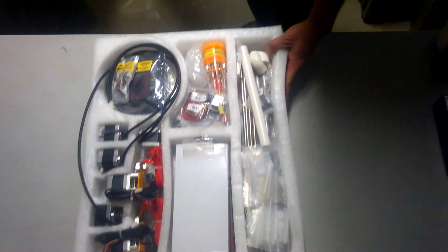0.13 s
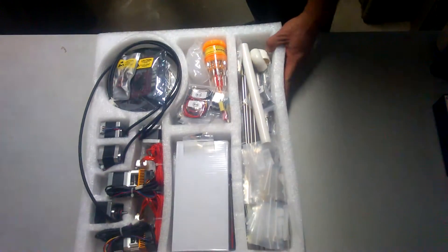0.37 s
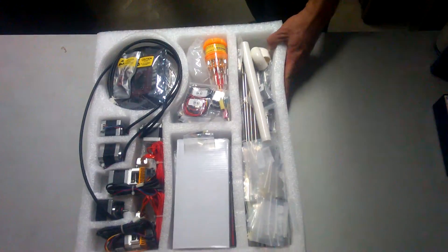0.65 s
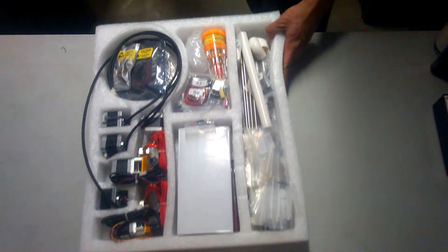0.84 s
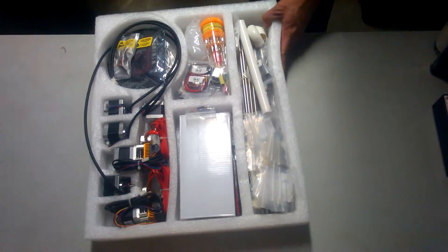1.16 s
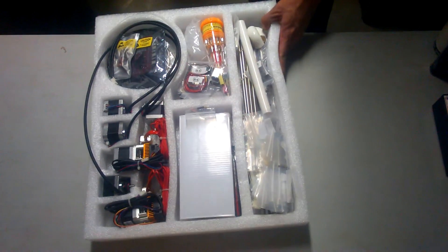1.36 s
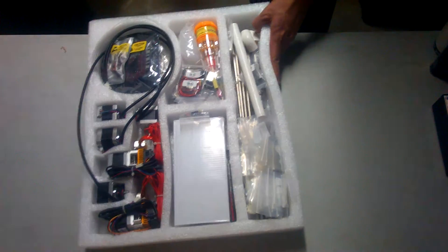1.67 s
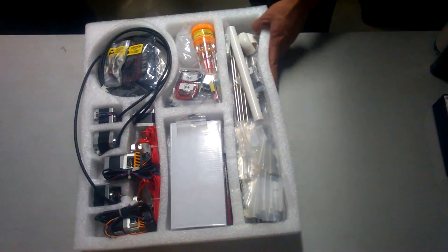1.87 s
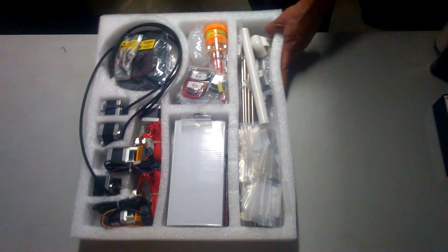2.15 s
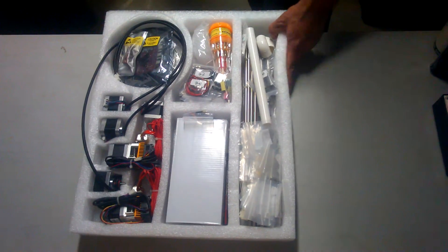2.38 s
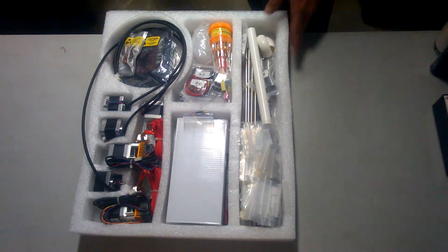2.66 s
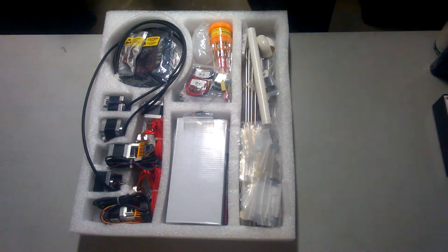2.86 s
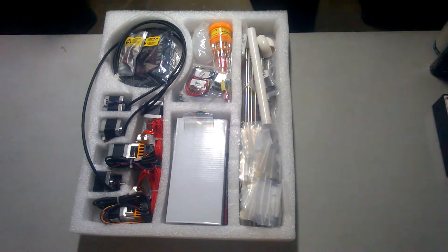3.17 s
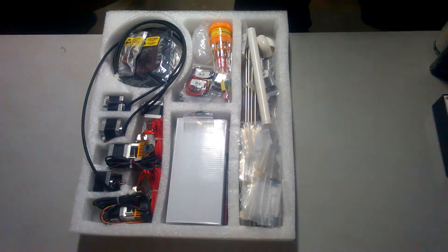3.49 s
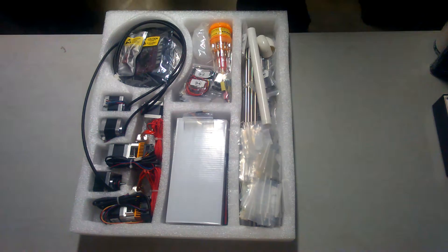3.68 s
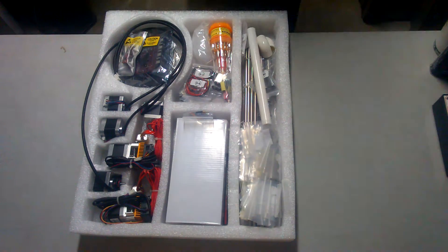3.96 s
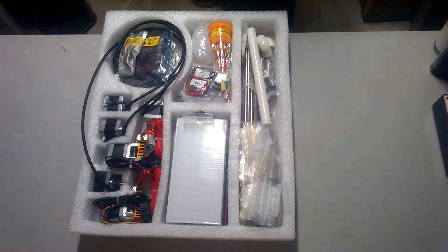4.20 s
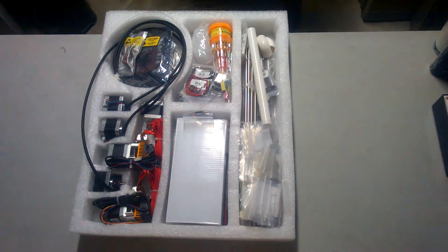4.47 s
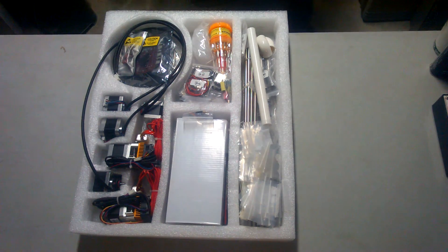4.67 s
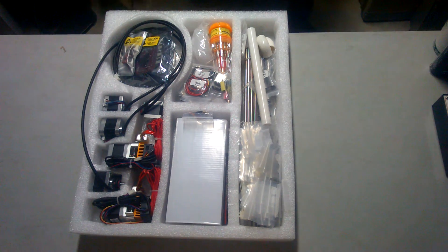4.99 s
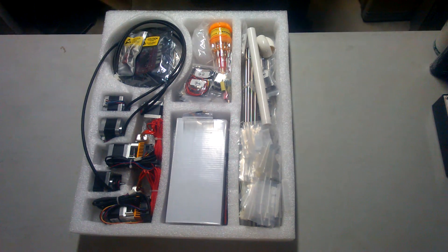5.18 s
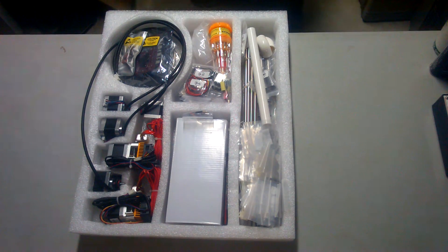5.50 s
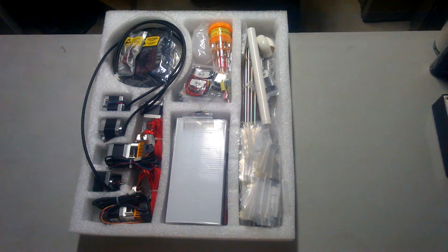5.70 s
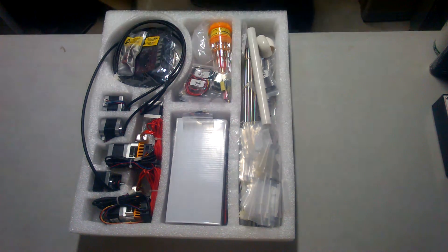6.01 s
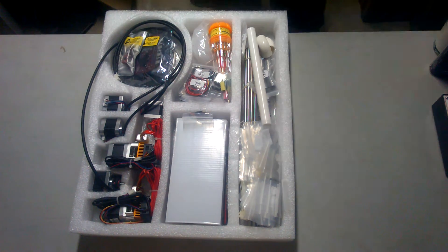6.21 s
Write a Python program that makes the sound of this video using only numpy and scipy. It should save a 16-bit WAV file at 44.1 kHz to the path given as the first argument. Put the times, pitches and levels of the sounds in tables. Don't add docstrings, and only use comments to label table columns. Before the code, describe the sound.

Close to a small camera in a quiet humming room, a foam tray is dragged over a table in short, soft, raspy strokes. One plastic part snaps sharply early on. Lighter brushing and tiny ticks follow, then a stiffer foam layer is pulled with loud hiss, squeaks and a low rising moan. It comes down in several hollow knocks that shake the table, and the room settles with faint ticks.

```python
import sys
import numpy as np
from scipy import signal
from scipy.fft import rfft, irfft, next_fast_len
from scipy.io import wavfile
from scipy.ndimage import uniform_filter1d, map_coordinates

SR = 44100
rng = np.random.default_rng(int(sys.argv[2]) if len(sys.argv) > 2 else 0)


def volts_from_decibels(level):
    exponent = np.asarray(level, float) / 20
    return 10 ** exponent


def store_wav(level_fs):
    pcm = np.round(np.clip(np.atleast_2d(level_fs), -1, 1) * 32767)
    wavfile.write(sys.argv[1], SR, pcm.T.astype(np.int16))


N = 279853

# freq_hz, density_db
HISS_SPECTRUM = [(5500, -23), (7500, -10.5), (9500, -4.5), (11500, -4), (13500, 1), (15400, 1)]
RASP_SPECTRUM = [(1500, -28.5), (2300, 0.5), (4000, -2), (6500, -2.5), (8500, -9)]
SCRAPE_SPECTRUM = [(300, -12), (550, -4), (900, 0), (1400, -1), (2000, -4.5), (2800, -55)]
TABLE_SPECTRUM = [(15, -13), (30, -4), (70, -12), (120, -2.5), (180, -32.5)]
ROOM_SPECTRUM = [(12, -43), (20, -17.5), (76, -0.5), (171, -9), (216, -10.5), (439, -10), (474, -13),
                 (513, -11), (613, -10.5), (1460, -28), (2200, -62.5), (2860, -64), (4840, -120)]
MIC_HISS_SPECTRUM = [(1500, -12), (3000, -6), (8000, -28), (13000, 13), (15400, 12)]

# freq_hz, width_hz, level_db
SHEET_MODES = [(507, 42, 3.5), (657, 34, 11), (835, 450, -1.5), (906, 11.6, 11), (1054, 63, -3),
               (1302, 19, 3.5), (1380, 13, -20)]
LOWER_MODES = [(145, 18, -4), (194.2, 15.2, 0), (231.7, 19, 0), (265, 25, -5)]
UPPER_MODES = [(306, 18, 2.5), (339.2, 16.2, 4), (394, 17.3, 0), (525.5, 67, -6.5)]
PART_MODES = [(653, 124, 3.5), (1380, 240, 2.5), (2270, 300, -2.5), (3700, 1100, -2), (9000, 9700, -8.5),
              (14000, 3000, -2)]
ROOM_TONES = [(33, 8.1, -2.5), (76.6, 5.9, -2), (205.4, 7.1, -4), (494, 27, -15.5)]

# start_s, peak_db, pitch_hz, t60_s
TICKS = [(1.568, -27.5, 12100, 0.0099), (2.4124, -35, 12000, 0.027), (2.9123, -42, 12100, .03),
         (3.059, -38, 12900, 0.024), (3.092, -41, 13000, .04), (3.136, -27, 13500, .02),
         (3.386, -29, 12500, .03), (3.518, -29, 11800, .03), (4.749, -24, 12600, 0.028),
         (4.885, -16.5, 12900, 0.052), (5.802, -34.5, 14000, .03), (5.8743, -28, 7100, 0.013),
         (5.9667, -33, 13100, 0.028), (6.227, -38, 3000, 0.033)]
# start_s, peak_db, t60_s
SNAP_BLOWS = [
    (1.3074, -15, 0.023),
    (1.3135, -34, 0.013),
]
# start_s, peak_db, pitch_hz, slap_db, t60_s
BUMPS = [
    (0.435, -30, 81.6, -12, 0.22),
    (3.061, -31, 201, -5, .1),
    (3.083, -28, 208, -9, 0.2),
    (4.349, -18.5, 87, -12, 0.13),
    (4.439, -6, 225, -9, 0.11),
    (4.856, -9.5, 213, -8, 0.2),
    (4.855, -12.5, 96.4, -17, 0.25),
    (4.995, -6.5, 374, 0, 0.13),
    (5.165, -13, 214, 1.5, 0.088),
]
# start_s, level_db, t60_s
JOLTS = [
    (4.33, -29, 2.4),
    (4.6, -28.5, .8),
    (4.72, -33, 1.),
    (4.855, -20.5, 0.27),
    (4.99, -26.5, 0.79),
    (5.155, -34, 2.3),
    (5.55, -40, 4),
]
# start_s, pitch_hz, level_db, length_s, unsteadiness
SQUEAKS = [(1.263, 3760, -38.5, 0.0055, 0.48), (1.45, 3700, -45, 0.0077, 0.34),
           (5.994, 3700, -51, 0.023, 0.21), (3.548, 1380, -25, 0.048, 0.039),
           (3.61, 1077, -21, 0.013, 0.035), (3.839, 14400, -13, .012, .05), (3.855, 14430, -18, .013, .05),
           (3.838, 9370, -27.5, 0.022, 0.11), (3.843, 11700, -31, .02, .3), (4.534, 4530, -27, 0.054, 0.62),
           (4.621, 4480, -25, 0.046, 0.49), (5.865, 11800, -41, 0.017, 0.12), (5.967, 13200, -34, .01, .1),
           (5.968, 9340, -46, .04, 0.041)]
# start_s, pitch_hz, level_db, length_s, unsteadiness
GROANS = [
    (4.07, 325, -24.5, .14, 0.012),
    (4.19, 212, -28, 0.05, .015),
    (3.585, 250, -21, 0.084, 0.014),
    (3.58, 655, -28.5, 0.079, .015),
]
# start_s, rise_s, fall_s, level_db
MOAN = [
    (3.91, 0.17, .1, -23.5),
]
MOAN_HARMONICS = [0.5, -1, -28, -21]
# start_s, rise_s, fall_s, level_db, upper_over_lower_db
FLEXES = [(2.38, .12, .3, -45, 5.5), (2.92, .04, .07, -45, -17), (3.03, .06, .05, -36, -14),
          (3.13, 0.064, .08, -38, -4.5), (3.32, 0.17, 0.21, -39, 3.5), (3.53, 0.082, 0.12, -24.5, -0.5),
          (3.78, 0.064, 0.042, -36, -2), (3.9, 0.14, 0.18, -25, 5), (4.14, 0.047, 0.066, -28.5, -5),
          (4.33, .13, 0.14, -18.5, -4.5), (4.45, 0.13, 0.44, -25.5, -1.5), (4.82, 0.063, .09, -21.5, -7),
          (4.95, 0.073, 0.16, -21, 1), (5.12, 0.098, 0.073, -24.5, 0), (5.2, 0.065, 0.3, -38, -4)]
# start_s, rise_s, fall_s, scrape_db, rasp_over_scrape_db
DRAGS = [(-.2, 0.32, 0.22, -38, 1), (.45, 0.057, 0.079, -43.5, -8), (.62, 0.25, 0.24, -34, 0),
         (0.919, 0.17, .13, -36.5, 0), (1.522, 0.23, .11, -36.5, -0.5), (1.84, 0.35, .19, -36, -1.5),
         (2.37, 0.065, 0.15, -34.5, -3.5), (2.5, .11, .11, -34, -8), (2.7, 0.053, 0.18, -44.5, 2),
         (2.88, 0.042, 0.065, -47.5, -11), (3.34, 0.044, .12, -43, -4), (3.511, 0.093, 0.12, -27, -5.5),
         (3.901, 0.14, .24, -26.5, -5), (4.331, 0.088, 0.064, -30, -0.5), (4.42, 0.093, 0.092, -32.5, -2),
         (4.52, .13, 0.098, -33, -6), (4.72, .08, 0.11, -38, -4.5), (4.85, 0.057, 0.12, -33, -15),
         (4.97, 0.044, 0.083, -25, -10.5), (5.08, 0.093, 0.11, -32.5, -8)]
# start_s, rise_s, fall_s, hiss_db
BRUSHES = [(.31, 0.073, 0.12, -43.5), (.4, 0.11, 0.19, -45), (1.2, 0.1, 0.23, -40), (1.6, 0.19, .1, -33),
           (2.41, .06, .06, -30), (2.5, 0.093, 0.12, -28), (2.72, .12, 0.067, -35.5),
           (2.9, 0.015, 0.091, -40.5), (3.06, 0.07, 0.052, -31), (3.15, 0.053, 0.14, -33),
           (3.35, 0.064, 0.1, -35.5), (3.5, 0.11, 0.16, -21.5), (3.66, 0.094, 0.073, -28),
           (3.834, 0.013, 0.042, -27.5), (3.845, 0.047, .08, -33), (3.9, .18, 0.28, -25.5),
           (4.15, 0.11, 0.11, -23), (4.33, 0.041, .04, -24), (4.42, .03, 0.02, -24.5),
           (4.44, .06, 0.28, -33), (4.73, .04, 0.18, -31), (4.87, .025, 0.067, -24), (4.9, .08, 0.058, -21),
           (5.0, 0.11, 0.13, -28), (5.12, 0.11, 0.1, -27.5), (5.28, 0.14, .4, -40),
           (5.85, 0.033, 0.085, -46.5), (5.95, .02, 0.072, -46), (6.21, 0.046, 0.02, -36),
           (6.24, .05, .2, -43)]

# freq_hz, share
IN_PHASE = [(30, 0.6), (80, 0.75), (200, 0.68), (400, 0.51), (650, 0.5), (1000, 0.16), (1400, 0.03)]
RIGHT_FIRST = [(450, 0.14), (1000, 0.45), (2600, 0.46), (4600, 0.3), (5400, 0.3), (7000, 0.22),
               (9000, 0.31), (11000, 0.89), (14000, 0.86)]
LEFT_FIRST = [(450, 0.0028), (1000, 0.42), (2600, 0.49), (4600, 0.45), (5400, 0.23), (7000, 0.16),
              (9000, 0.027), (11000, 0.03), (14000, 0.088)]


def unit(x):
    return x / np.sqrt(np.mean(x ** 2) + 1e-20)


def along(points, hz):
    f, v = np.transpose(points)
    return np.interp(np.log(hz + 1), np.log(f + 1), v)


def wobble(rate):
    knots = rng.standard_normal(int(N * rate / SR) + 4)
    return map_coordinates(knots, [np.arange(N) * rate / SR])


def filtered(x, response):
    m = next_fast_len(N + SR // 2)
    return irfft(rfft(x, m) * response(np.fft.rfftfreq(m, 1 / SR)), m)[..., :N]


def coloured(x, spectrum):
    return unit(filtered(x, lambda hz: volts_from_decibels(along(spectrum, hz))))


def modes(peaks):
    def response(hz):
        total = 0
        for k, (centre, width, db) in enumerate(peaks):
            damping = 1j * hz * width
            total = total + (-1) ** k * volts_from_decibels(db) * damping / (centre * centre - hz * hz + damping)
        return total
    return response


def slips(rate, grain_db, clump_db):
    return rng.standard_normal((2, N)) * volts_from_decibels(grain_db * wobble(rate) + clump_db * wobble(25))


def burst(db, t60, tail):
    t = np.arange(SR // 4) / SR
    fall = volts_from_decibels(-60 * t / t60) + tail * volts_from_decibels(-60 * t / 0.27)
    return volts_from_decibels(db) * fall * rng.standard_normal((2, len(t)))


def strokes(rows, flat, extra_db=0):
    edge_db = 20
    t, power = np.arange(N) / SR, np.zeros(N)
    for (s, rise, fall, db, *_), more in zip(rows, np.broadcast_to(extra_db, len(rows))):
        at = slice(max(0, round((s - rise) * SR)), round((s + rise + 2 * fall) * SR))
        late = t[at] - s - rise
        drop_db = edge_db * np.abs(late / np.where(late < 0, rise, fall)) ** flat
        power[at] += volts_from_decibels(2 * (db + more - drop_db))
    return power


def room():
    t = np.arange(N) / SR
    rumble = coloured(slips(6, grain_db=1.7, clump_db=1.0), ROOM_SPECTRUM)
    tones = unit(filtered(slips(2.1, grain_db=0.5, clump_db=1.0), modes(ROOM_TONES)))
    far_modes = modes([(224.6, 7, 0.08), (74.2, 2.8, 0.92)])
    far = np.exp(-(t / 0.82) ** 4) * unit(filtered(rng.standard_normal((2, N)), far_modes))
    mic_hiss = coloured(rng.standard_normal((2, N)), MIC_HISS_SPECTRUM)
    return volts_from_decibels(-44) * rumble + volts_from_decibels(-50) * tones + volts_from_decibels(-49.5) * far + volts_from_decibels(-49) * mic_hiss


def ticks():
    out = np.zeros((2, N + SR))
    for s, db, hz, t60 in TICKS:
        band = signal.butter(2, [hz * 0.72, min(hz * 1.3, 17000)], "bandpass", fs=SR)
        start = round(s * SR)
        out[:, start:start + SR // 4] += signal.lfilter(*band, burst(db + 4, t60, tail=0.17))
    return out[:, :N]


def snap():
    blows = np.zeros((2, N))
    for s, db, t60 in SNAP_BLOWS:
        start = round(s * SR)
        blows[:, start:start + SR // 4] += burst(db + 5, t60, tail=0.26)
    return filtered(blows, modes(PART_MODES))


def bumps():
    low, slap = np.zeros((2, N + SR)), np.zeros((2, N + SR))
    t = np.arange(SR // 3) / SR
    for s, db, hz, slap_db, t60 in BUMPS:
        at = slice(round(s * SR), round(s * SR) + len(t))
        fall = volts_from_decibels(db - 60 * t / t60) * (1 - np.exp(-t / 0.0042))
        low[:, at] += 0.64 * fall * np.sin(2 * np.pi * hz * t + [[0], [1.5]])
        slap[:, at] += volts_from_decibels(slap_db + 8.0) * fall * rng.standard_normal((2, len(t)))
    return low[:, :N] + filtered(slap[:, :N], modes(SHEET_MODES))


def table_jolts():
    t, power = np.arange(N) / SR, np.zeros(N)
    for s, db, t60 in JOLTS:
        age = np.maximum(t - s, 0)
        power += (volts_from_decibels(db - 60 * age / t60) * (1 - np.exp(-age / 0.012))) ** 2
    return np.sqrt(power) * coloured(slips(18, grain_db=2.0, clump_db=.5), TABLE_SPECTRUM)


def squeaks():
    out, t = np.zeros((2, N + SR)), np.arange(SR // 2) / SR
    for s, hz, db, length, unsteady in SQUEAKS + GROANS:
        jitter = uniform_filter1d(rng.standard_normal((2, len(t))), size=60)
        phase = 2 * np.pi * hz * t + unsteady * np.cumsum(jitter, axis=1)
        attack = 1 - np.exp(-(t / (0.23 * length)) ** 2)
        hold = np.exp(-(t / length) ** 3)
        echo = 0.27 * volts_from_decibels(-60 * t / 0.25)
        start = round(s * SR)
        out[:, start:start + len(t)] += volts_from_decibels(db) * attack * (hold + echo) * np.sin(phase)
    return out[:, :N]


def moan():
    start_hz, end_hz, speedup_s = 115, 206.5, .045
    age = np.maximum(np.arange(N) / SR - MOAN[0][0], 0)
    glide = end_hz - (end_hz - start_hz) * np.exp(-(age / speedup_s) ** 1.4 / 2)
    phase = 2 * np.pi * np.cumsum(glide * (1 + 0.013 * wobble(40))) / SR
    paths = np.zeros((2, N))
    for path, lead in zip(paths, (0, .4)):
        for k, db in enumerate(MOAN_HARMONICS):
            path += volts_from_decibels(db + 2 * wobble(30)) * np.sin((k + 1) * phase + lead)
    return np.sqrt(strokes(MOAN, flat=1.8)) * paths


def hollow_layer():
    def radiates(hz):
        return 1 / (1 + (135 / (hz + 1)) ** 6)

    cells = slips(160, grain_db=2.5, clump_db=1.25)
    lower = unit(filtered(cells, lambda hz: radiates(hz) * modes(LOWER_MODES)(hz)))
    upper = unit(filtered(cells, lambda hz: radiates(hz / 2) * modes(UPPER_MODES)(hz)))
    lower_level = np.sqrt(strokes(FLEXES, flat=1.9))
    upper_level = np.sqrt(strokes(FLEXES, flat=1.9, extra_db=[row[-1] for row in FLEXES]))
    calm = volts_from_decibels(np.where(np.arange(N) < 4.3 * SR, -5, 0))
    return volts_from_decibels(-1.6) * calm * (lower_level * lower + upper_level * upper)


def rubbing():
    heavy = strokes(DRAGS, flat=2.78)
    rough = strokes(DRAGS, flat=2.78, extra_db=[row[-1] for row in DRAGS])
    light = strokes(BRUSHES, flat=3.3)
    hiss = np.sqrt(light + volts_from_decibels(2 * -3) * rough + volts_from_decibels(2 * -76))
    rasp = np.sqrt(rough + volts_from_decibels(2 * -14.5) * light + volts_from_decibels(2 * -59))
    scrape = np.sqrt(heavy + volts_from_decibels(2 * -24.5) * light + volts_from_decibels(2 * -54.5))
    cells = slips(700, grain_db=1.0, clump_db=1.01)
    sheet = unit(coloured(cells, SCRAPE_SPECTRUM) + 0.59 * unit(filtered(cells, modes(SHEET_MODES))))
    rub = hiss * coloured(cells, HISS_SPECTRUM) + rasp * coloured(cells, RASP_SPECTRUM)
    return volts_from_decibels(3) * (rub + volts_from_decibels(-3.5) * scrape * sheet)


def likeness(hz):
    lag_s = 17.25 / SR
    turn = np.exp(2j * np.pi * hz * lag_s + 1j * along([(12800, 0.1), (15200, 0.57)], hz))
    c = along(IN_PHASE, hz) - along(RIGHT_FIRST, hz) * turn - along(LEFT_FIRST, hz) / turn
    return c / np.maximum(1, np.abs(c) / .995)


def scene():
    background = room() + ticks() + snap()
    layer = bumps() + table_jolts() + squeaks() + moan() + hollow_layer()
    a, b = background + layer + rubbing()
    own_share = filtered(b, lambda hz: np.sqrt(1 - np.abs(likeness(hz)) ** 2))
    return np.array([a, filtered(a, likeness) + own_share])


def low_pass(x):
    return signal.sosfilt(signal.butter(12, 16010, fs=SR, output="sos"), x)


def record(dry):
    right_over_left = [(60, -3.5), (150, -1.5), (400, -0.5), (2000, -.5), (8000, -1), (12000, 1.5)]  # Hz, dB
    band_limit = [(15480, 0), (15560, -25), (15900, -58), (16100, -90)]  # Hz, dB

    def microphones(hz):
        tilt = volts_from_decibels(np.outer([-.5, .5], along(right_over_left, hz)))
        return tilt * volts_from_decibels(along(band_limit, hz))

    mix = filtered(dry, microphones)
    return low_pass(mix)


dry = scene()
out = record(dry)
store_wav(out)
```